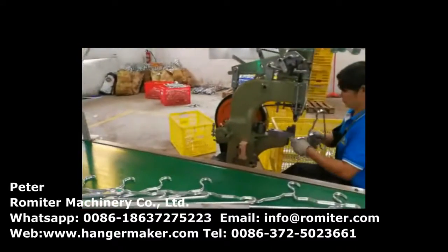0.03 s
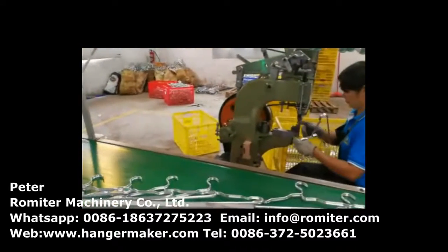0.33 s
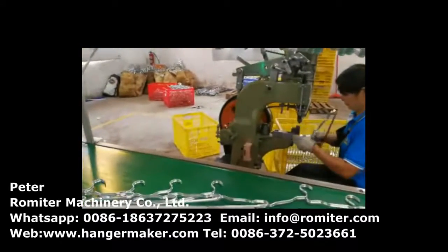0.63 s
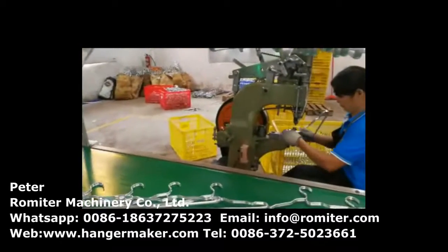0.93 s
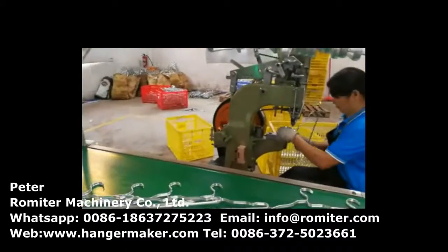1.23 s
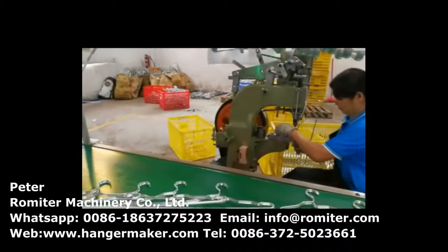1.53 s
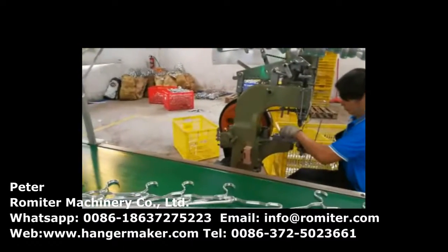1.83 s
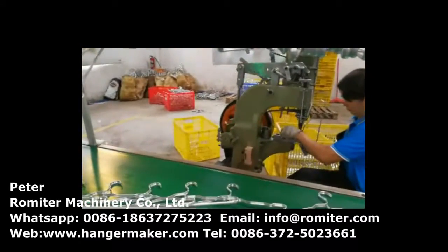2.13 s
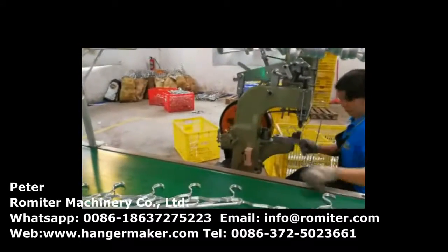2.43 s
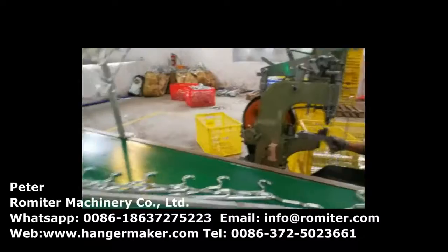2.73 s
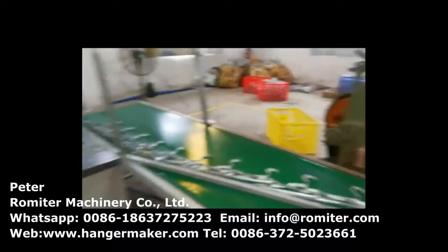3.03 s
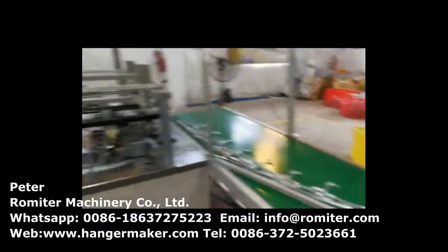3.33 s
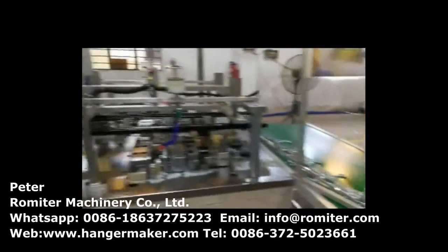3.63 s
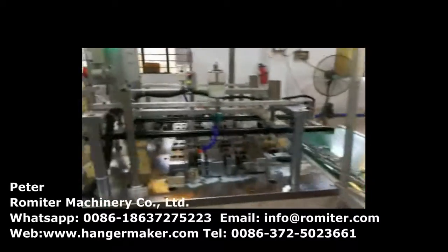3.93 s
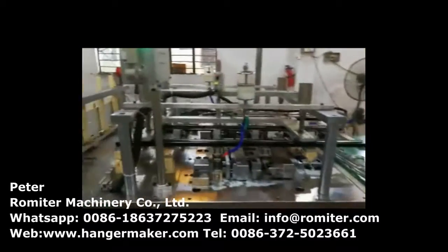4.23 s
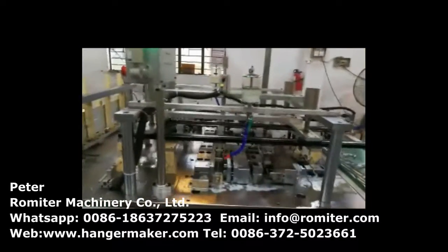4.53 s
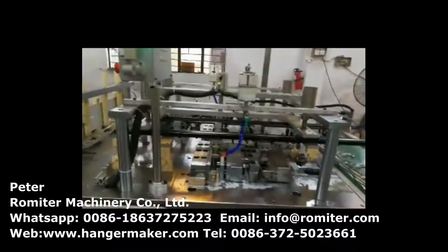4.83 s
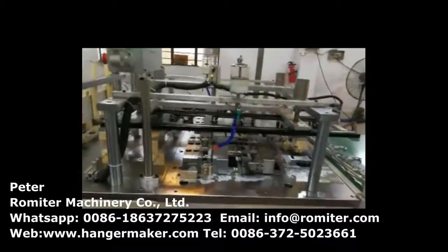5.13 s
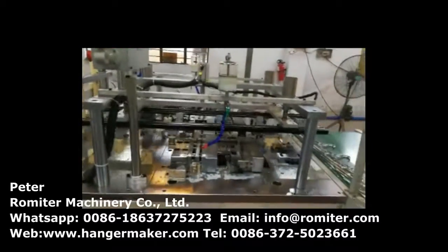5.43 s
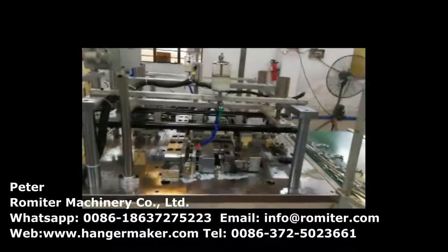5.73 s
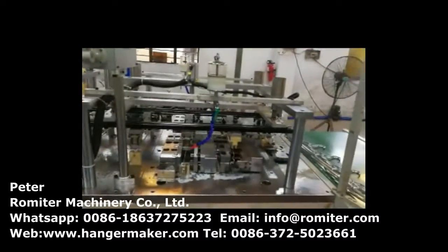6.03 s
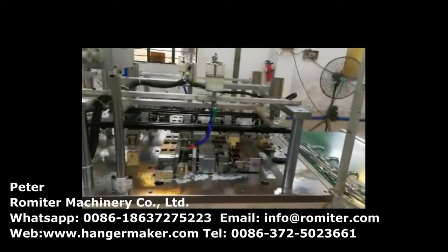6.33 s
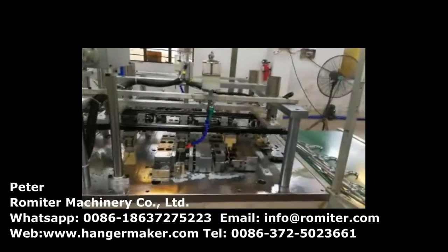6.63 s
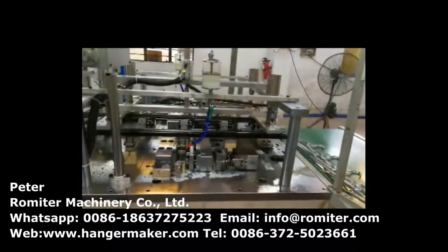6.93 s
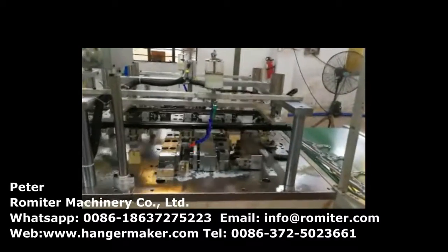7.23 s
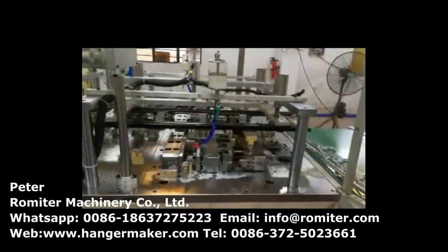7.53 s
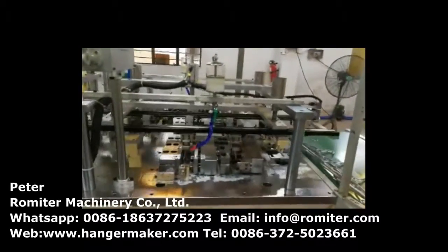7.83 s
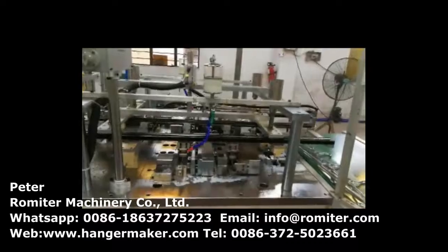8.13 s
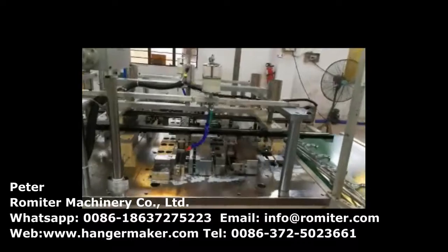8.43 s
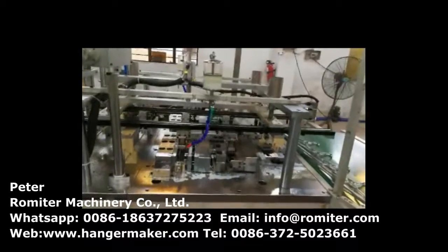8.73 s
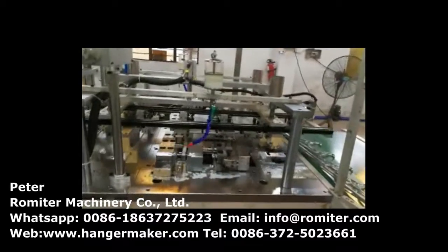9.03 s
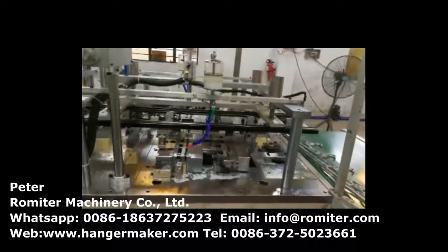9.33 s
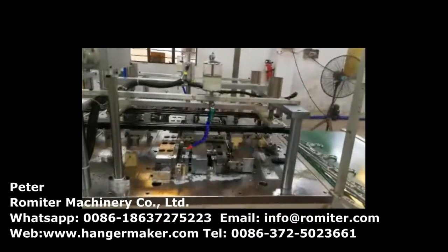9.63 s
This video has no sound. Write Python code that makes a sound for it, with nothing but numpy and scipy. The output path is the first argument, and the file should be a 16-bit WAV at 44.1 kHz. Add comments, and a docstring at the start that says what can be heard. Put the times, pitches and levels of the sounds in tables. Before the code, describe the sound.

Continuous factory noise surrounds the listener, with rumbling drives, rattling levers and dull thumps. Over it, near and to the right, a pneumatic wire forming machine keeps puffing and spitting air, with occasional falling squeals. Clusters of metal clanks come about two seconds in and again near six seconds, while steel wire rasps and rings in between. A few very high squeaks come from the left, and the machinery runs on throughout.

```python
"""Air hisses and spits close by on the right: a pneumatic machine forms wire coat hangers.
Its valves puff in the same order every cycle and its cylinders vent in falling chirps.
The forming tools clank; the steel wire scrapes and rings in its high bending modes.
Behind it, drives surge and rumble in a busy hall, ducked by gain control under each loud hiss."""
import sys
import numpy as np
from scipy import signal
from scipy.fft import rfft, irfft
from scipy.io import wavfile
from scipy.ndimage import uniform_filter1d

SR = 44100
rng = np.random.default_rng(int(sys.argv[2]) if len(sys.argv) > 2 else 0)


def persist_wave(psi):
    """Save psi, clipped to +-1, as 16-bit WAV."""
    counts = np.round(np.clip(psi, -1, 1) * 32767).astype(np.int16)
    wavfile.write(sys.argv[1], SR, np.atleast_2d(counts).T)


N = 436590
T = np.arange(N) / SR


def undb(db):
    """Decibels to gain."""
    return np.exp(np.asarray(db) * (np.log(10) / 20))


def unit(x):
    """Scale to rms 1."""
    return x / np.sqrt(np.mean(x ** 2))


def colour(x, points):
    """Filter by a spectrum of (f/Hz, gain/dB) points."""
    hz, db = np.transpose(points)
    f = np.fft.rfftfreq(N, 1 / SR)
    return irfft(rfft(x) * undb(np.interp(np.log(f + 1), np.log(hz), db)), N)


def resonate(x, hz, *widths_hz):
    """One resonance per width, in series; gain 1 at the centre."""
    for width in widths_hz:
        x = signal.lfilter(*signal.iirpeak(min(hz, SR * .45), hz / width, fs=SR), x)
    return x


def walk(rate_hz):
    """Random drift, rms 1."""
    steps = T * rate_hz
    points = rng.standard_normal(int(steps[-1]) + 2)
    return unit(np.interp(steps, np.arange(len(points)), points))


def rough(rate_hz, depth_db, ring_s):
    """Envelope of a steady flow with small random knocks on top, rms 1."""
    knocks = (rng.random(N) < rate_hz / SR) * undb(4 * np.minimum(rng.exponential(size=N), 3))
    clatter = unit(signal.lfilter([1], [1, -np.exp(-1 / (ring_s * SR))], knocks))
    return unit(np.sqrt(1 + (undb(depth_db) * clatter) ** 2))


def add(track, s, sound):
    """Mix a sound in at time s; it may overhang either end."""
    i = int(s * SR)
    first, last = max(i, 0), min(i + sound.shape[-1], N)
    if last > first:
        track[..., first:last] += sound[..., first - i:last - i]


def burst():
    """Time axis and stereo noise for one short event."""
    return T[:SR // 2], rng.standard_normal((2, SR // 2))


def envelope(t, length_s, attack_s, release_s):
    """Attack, hold, release."""
    return np.minimum(t / attack_s, 1) * np.exp(-np.maximum(t - length_s, 0) / release_s)


def power(events, attack_s, release_s):
    """Summed power of (t/s, length/s, level/dB) events."""
    out = np.zeros(N)
    for s, length_s, db in events:
        add(out, s, (undb(db) * envelope(T[:SR], length_s, attack_s, release_s)) ** 2)
    return out


def lulls(events, release_s, attack_s=0.013):
    """Brief level dips in dB."""
    out = np.zeros(N)
    for s, length_s, db in events:
        add(out, s, db * envelope(T[:SR], length_s, attack_s, release_s))
    return out


def hall(x, t60_s=0.43):
    """Diffuse tail from the walls, unrelated at the two ears."""
    t, noise = burst()
    tail = noise * np.exp(-np.log(1000) * t / t60_s) * (t > .008)
    return signal.fftconvolve(x, tail / np.sqrt(np.sum(tail[0] ** 2)), axes=1)[:, :N]


def scattered_noise(ring_s, direct, rate_hz):
    """Nearby steel scatters noise; each ear gets its own fine ripple, shifting as parts move."""
    source, out = rng.standard_normal((1, N)), 0
    for _ in range(2):
        t, noise = burst()
        paths = rfft((noise * np.exp(-t / ring_s))[:, :2048])
        paths /= np.sqrt(uniform_filter1d(np.abs(paths) ** 2, size=16, axis=1))  # ripple only
        out = out + walk(rate_hz) * signal.oaconvolve(source, irfft(paths), axes=1)[:, :N]
    steady = out / np.sqrt(uniform_filter1d(out ** 2, size=2048, axis=1))
    return unit(steady + direct * rng.standard_normal((2, N)))


# successive surges of a heavy drive: roar/dB, rumble/dB
DRIVE_SURGES = [(-29, -35), (-29.5, -33.5), (-28, -40.5), (-27.5, -33.5), (-23.5, -34), (-24.5, -30),
                (-35.5, -43)]
# lighter strokes of the machines around: t/s, length/s, roar/dB, rumble/dB
MACHINE_STROKES = [(0.964, .1, -33.5, -34), (1.08, 0.056, -27, -33), (2.567, 0.37, -28, -33),
                   (3.307, 0.14, -26.5, -33), (3.692, 0.037, -27, -34.5), (4.146, 0.45, -30, -36),
                   (4.618, 0.053, -37, -30), (4.946, 0.078, -29.5, -34.5), (5.247, 0.14, -29, -36),
                   (5.698, 0.47, -26.5, -34), (6.554, 0.33, -30.5, -39.5), (8.144, 0.037, -26.5, -32.5),
                   (8.457, 0.044, -28, -37), (9.242, 0.08, -30, -36.5), (9.547, 0.54, -33, -41)]

def workload(idle_db, column, first_s=-0.22, period_s=1.511, surge_s=0.37):
    """Roar (column 0) or rumble (column 1) in dB: idling, regular surges and single strokes."""
    surges = [(first_s + k * period_s, surge_s, db[column]) for k, db in enumerate(DRIVE_SURGES)]
    strokes = [(s, length_s, db[column]) for s, length_s, *db in MACHINE_STROKES]
    busy = power(surges, attack_s=0.15, release_s=0.18) + power(strokes, attack_s=0.04, release_s=0.18)
    return 10 * np.log10(undb(idle_db) ** 2 + busy)


# dips in the din: t/s, length/s, depth/dB
DIN_DIPS = [(.715, 0.21, -5.5), (1.25, 0.27, -1.5), (3.92, 0.3, -4), (4.74, 0.14, -1.5),
            (5.095, 0.067, -10.5), (6.48, 0.034, -1), (6.92, 0.3, -1), (8.02, 0.081, -3.5)]

def din_gain():
    """The din drops briefly now and then."""
    return undb(lulls(DIN_DIPS, release_s=0.032))


# frame resonances: f/Hz, width/Hz, gain/dB
FRAME_MODES = [(166.5, 6.8, 1.5), (192, 11.6, 3.5), (312, 24, -10), (508, 12, -16)]
# rumble spectrum: f/Hz, level/dB
RUMBLE_SPECTRUM = [(20, -18), (45, -8), (75, -1.5), (125, -0.5), (180, -3.5), (260, 2), (340, 2), (450, -5),
                   (700, -34), (2000, -58)]

def drives(db):
    """Motors, belts and strokes shake the frame; the bass is alike at both ears."""
    mid = rng.standard_normal(N)
    side = colour(rng.standard_normal(N), [(30, -8), (80, -13), (180, -14.5), (320, -12.5), (550, 0.5)])
    shake = np.array([mid + side, mid - side])
    force = undb(db) * rough(rate_hz=30, depth_db=-6, ring_s=.018)
    frame = sum(undb(g + 2.5 * walk(6)) * resonate(shake, hz, width) for hz, width, g in FRAME_MODES)
    rumble = undb(-3 + 2 * walk(7.7)) * unit(colour(shake, RUMBLE_SPECTRUM))
    return force * (rumble + undb(-4) * unit(frame))


# roar spectrum: f/Hz, level/dB
ROAR_SPECTRUM = [(150, -39), (350, -6.5), (560, -3.5), (700, 0), (1400, 1), (2000, -3.5), (2800, -7.5),
                 (4500, -25), (7000, -15), (15000, -41)]
# gear whine: f/Hz, width/Hz, level/dB
GEAR_BANDS = [(1692, 45, -50), (3400, 700, -40)]

def roar(db, gears_db=-2.5):
    """The other machines blur into a rattling roar; gears whine and chatter under load."""
    din = scattered_noise(ring_s=0.0095, direct=0.87, rate_hz=7)
    din *= rough(rate_hz=62, depth_db=0, ring_s=0.031)
    gears = sum(undb(g + 3.5 * walk(7)) * unit(resonate(din, hz, width, 2 * width))
                for hz, width, g in GEAR_BANDS)
    whine = undb(gears_db + db - db.mean()) * gears * undb([[-7], [0]])
    return undb(db) * unit(colour(din, ROAR_SPECTRUM)) + whine


def linkages(db, count=170, gain_db=-3, spread_db=2, ring_s=0.0065):
    """Cams and levers of the other machines clack at random, harder under load."""
    out, t = np.zeros((2, N)), T[:SR // 8]
    for when, size, side, *pitches in rng.random((count, 9)):
        modes = sum(np.sin(2 * np.pi * (600 * 5.5 ** p * t + rng.random((2, 1)))) for p in pitches)
        clack = undb(gain_db - spread_db * size) * modes * envelope(t, 0, 0.0012, ring_s)
        add(out, when * T[-1], clack * np.sqrt([[side], [1 - side]]))
    return undb(db) * out


# machine bed modes: f/Hz, level/dB
BED_MODES = [(80, 2), (120, 2), (185, 1), (280, 3.5)]
# slide landings: t/s, level/dB
SLIDE_THUMPS = [(.24, -38), (1.46, -36), (1.627, -31.5), (2.26, -35), (2.86, -32), (3.2, -35),
                (4.23, -39.5), (4.67, -39), (4.76, -35), (5.349, -39), (5.748, -35), (6.16, -31.5),
                (8.661, -32), (9.259, -34)]

def thumps(attack_s=0.0035, ring_s=0.025, scatter_db=2, detune=0.067):
    """A heavy slide lands and the machine bed booms briefly, alike at both ears."""
    out, t = np.zeros(N), T[:SR // 2]
    for s, db in SLIDE_THUMPS:
        boom = 0
        for hz, mode_db in BED_MODES:
            size, shift, phase = rng.standard_normal(3)
            cycles = hz * (1 + detune * shift) * t + phase
            boom += undb(mode_db + scatter_db * size) * np.sin(2 * np.pi * cycles)
        add(out, s, undb(db) * boom * envelope(t, attack_s, attack_s, ring_s))
    return out


# feed drive resonances: f/Hz, width/Hz, gain/dB
FEED_MODES = [(1490, 110, -1), (1682, 57, -2), (3370, 160, 0)]
# long pulls of wire: t/s, length/s, level/dB
FEED_PULLS = [(7.13, 0.36, -37), (7.37, 0.385, -31.5)]

def pulls():
    """The feed drive drones in its resonances while it draws a length of wire."""
    noise = rng.standard_normal((2, N))
    drone = sum(undb(db + 1.8 * walk(12)) * unit(resonate(noise, hz, width, 3 * width))
                for hz, width, db in FEED_MODES)
    return np.sqrt(power(FEED_PULLS, attack_s=0.02, release_s=0.027)) * drone * undb([[-3], [0]])


# roller rasp spectrum: f/Hz, level/dB
RASP_SPECTRUM = [(1200, -22), (2200, -9), (2800, -8), (3300, 0), (4200, -7), (4900, -6), (5400, -11.5),
                 (8000, -45)]

def rollers(air_db, level_db=-24, follow=0.24):
    """Wire rasps through the straightening rollers in tiny catches, harder as the cylinders move."""
    catches = scattered_noise(ring_s=0.0065, direct=0.28, rate_hz=9)
    catches *= rough(rate_hz=24, depth_db=-1.5, ring_s=0.031)
    return undb(level_db + follow * (air_db - air_db.mean())) * unit(colour(catches, RASP_SPECTRUM))


def jingle(count=90, spread_db=8, ring_s=0.0074):
    """Loose hangers and small parts tick together, each at its own high pitch."""
    out, t = np.zeros((2, N)), T[:SR // 8]
    for when, pitch, size, side in rng.random((count, 4)):
        hz = 6800 + 6500 * pitch ** 2
        ping = np.sin(2 * np.pi * hz * t) * envelope(t, .003, .003, ring_s)
        db = -27.5 - 8 * pitch + spread_db * size
        add(out, when * T[-1], undb(db) * ping * np.array([[.5 + side], [1]]))
    return out


# slide squeaks: t/s, level/dB, f/Hz
SLIDE_SQUEAKS = [(1.575, -29, 12700), (2.11, -18.5, 10640), (4.9, -20, 12900), (5.48, -27, 12800),
                 (9.365, -29, 12900)]

def squeaks(rise_s=0.017, width_hz=250):
    """A dry slide on the left gives brief, very high squeaks."""
    out = np.zeros((2, N))
    for s, db, hz in SLIDE_SQUEAKS:
        t, noise = burst()
        add(out, s, undb(db) * np.exp(-(t / rise_s - 1) ** 2) * unit(resonate(noise, hz, width_hz)))
    return out * undb([[0], [-7]])


# bending modes of the wire: f/Hz, gain/dB
WIRE_MODES = [(3560, 2), (3910, -2), (4285, -4), (4660, -4), (5040, -0.5), (5460, 1), (5880, -5), (6309, 1),
              (6765, 5), (7236, 0), (7710, 3), (8190, 0.5), (8742, -2.5), (9220, -1.5), (10292, -0.5)]

def wire(push, width_hz=55):
    """Air jets and strokes set the long wire ringing in its bending modes."""
    return sum(undb(db + 3.5 * walk(6)) * resonate(push, hz, width_hz) for hz, db in WIRE_MODES)


# ringing wire scrapes, short hisses and soft stretches of mid-pitched rasp:
# t/s, length/s, level/dB, brightest f/Hz, rasp re ring/dB
SCRAPES_AND_HISSES = [(0.655, 0.11, -24.5, 5450, -2), (0.699, 0.082, -24.5, 8000, 11.5),
                      (0.95, 0.1, -33, 4000, 11.5), (1.798, .23, -22, 8640, 5.5),
                      (1.817, 0.16, -25.5, 4270, -2), (3.828, .03, -17, 7400, 1),
                      (3.932, 0.045, -19.5, 6960, 4), (3.969, .07, -21, 7000, 2),
                      (4.345, 0.043, -23, 8200, 8.5), (4.352, 0.044, -26.5, 4400, 8.5),
                      (5.026, .025, -21.5, 6750, -4), (5.086, 0.072, -18, 7850, 5),
                      (7.711, 0.075, -22.5, 6550, -6), (7.837, 0.073, -16, 7400, -10),
                      (8.994, 0.13, -15, 7150, 8.5), (9.066, 0.11, -19.5, 6260, 5),
                      (1.449, 0.44, -35.5, 2700, 4.5), (6.171, 0.11, -20.5, 6560, -8),
                      (7.96, 0.082, -28, 4500, 5), (8.555, 0.041, -27.5, 4030, 9.5),
                      (8.719, .14, -38, 2660, 9), (9.529, .35, -35, 2600, 11.5)]

def scrapes_and_hisses(detune=0.006, catch_db=1, width_hz=45,
                       attack_s=0.0084, release_s=0.015, ring_s=0.039):
    """A noise band plus ringing wire modes: a stick-slip scrape, or a hiss or rasp if noise leads."""
    out = np.zeros((2, N))
    for s, length_s, db, hz, rasp_db in SCRAPES_AND_HISSES:
        t, noise = burst()
        push = resonate(noise, hz, 1470)
        modes = 0
        for f, mode_db in WIRE_MODES:
            mode = resonate(push, f * (1 + detune * rng.uniform(-1, 1)), width_hz)
            modes += undb(mode_db) * resonate(mode, f, 300)
        ring = unit(modes) * envelope(t, length_s, attack_s, ring_s)
        rasp = unit(resonate(noise, hz, 3000, 4800)) * envelope(t, length_s, attack_s, release_s)
        add(out, s, undb(db) * (ring + undb(rasp_db) * rasp))
    return out * unit(undb(catch_db * walk(110)))


# hanger knocks on the tooling: t/s, level/dB, brightest f/Hz, t60/s
HANGER_CLINKS = [(2.261, -13, 7700, 0.057), (2.286, -10, 7700, 0.035), (2.324, -15.5, 3870, 0.051),
                 (3.619, -13, 8950, 0.16), (5.636, -14, 7000, 0.12), (5.985, -14, 8400, 0.068),
                 (7.626, -14, 8600, .15), (7.776, -13, 3700, 0.065), (9.321, -13, 7350, 0.084)]

def clinks(scatter_db=4, detune=0.0123, reach_octaves=0.11, tick_db=-3, tick_s=0.0069):
    """A hanger strikes steel: a tick, then the wire rings in the modes the contact favours."""
    out = np.zeros((2, N))
    for s, db, hz, t60_s in HANGER_CLINKS:
        t, noise = burst()
        ring = 0
        for f, _ in WIRE_MODES:
            size, shift = rng.standard_normal(2)
            gain = undb(scatter_db * size) / (1 + (np.log2(f / hz) / reach_octaves) ** 4)
            cycles = f * (1 + detune * shift) * t + rng.standard_normal((2, 1))
            ring += gain * np.sin(2 * np.pi * cycles)
        tick = unit(resonate(noise, hz, 0.38 * hz)) * np.exp(-t / tick_s)
        add(out, s, undb(db) * (unit(ring) * np.exp(-np.log(1000) * t / t60_s) + undb(tick_db) * tick))
    return out


# modes of the struck die: f/Hz, level/dB
DIE_MODES = [(700, -1.5), (1100, -2), (1830, -1.5), (2100, -5), (2650, -9), (2950, -1.5), (3295, -0.5),
             (3470, 2), (3970, 0)]
# tool blows: t/s, level/dB, brightest f/Hz, t60/s
TOOL_BLOWS = [(1.997, -16, 2500, 0.085), (2.049, -5.5, 2700, 0.077), (2.11, -12.5, 2770, 0.081),
              (2.411, -15, 2000, 0.057), (5.814, -14.5, 2870, 0.087), (5.919, -13.5, 2460, 0.17),
              (6.311, -16, 3140, 0.076), (7.637, -13, 3040, 0.028), (7.776, -27, 4000, 0.066),
              (8.578, -24, 3600, 0.11), (9.267, -16, 4400, 0.1)]

def blows(scatter_db=3.5, detune=0.0198, reach_octaves=0.85, rattle_db=-3, crack_db=-8):
    """Steel tools hit their stops: a small crack, then the die rings while loose parts rattle."""
    out = np.zeros((2, N))
    for s, db, hz, t60_s in TOOL_BLOWS:
        t, noise = burst()
        ring = 0
        for f, mode_db in DIE_MODES:
            size, shift = rng.standard_normal(2)
            gain = undb(mode_db + scatter_db * size) / np.hypot(1, np.log2(f / hz) / reach_octaves)
            cycles = f * (1 + detune * shift) * t + rng.standard_normal((2, 1))
            ring += gain * np.sin(2 * np.pi * cycles)
        rattle = undb(rattle_db) * unit(resonate(noise, hz, hz, 2 * hz))
        decay = (1 - np.exp(-t / 0.00038)) * np.exp(-np.log(1000) * t / t60_s)
        crack = undb(crack_db) * noise * np.exp(-t / 0.0041)
        add(out, s, undb(db) * ((unit(ring) + rattle) * decay + crack))
    return out * undb([[-5], [0]])


# cylinders venting: t/s, level/dB, starting f/Hz, length/s
CYLINDER_VENTS = [(0.868, -15, 5000, 0.061), (1.678, -15, 4410, 0.055), (4.115, -14, 4400, 0.026),
                  (4.766, -12.5, 4900, 0.085), (5.577, -16, 4510, 0.04), (8.671, -8.5, 5020, 0.062),
                  (9.473, -14, 4200, 0.06)]

def vents(glide_s=.058, end_hz=2450, waver_hz=120, flutter_hz=280, spray_db=-10,
          echo_s=0.011, echo_db=2, tail_s=0.048, tail_db=-15):
    """A cylinder dumps its air: a rough squeal falls amid spray, echoed briefly by nearby steel."""
    out = np.zeros((2, N))
    flutter_band = signal.butter(2, flutter_hz, fs=SR, output="sos")
    spray_band = signal.butter(4, [3000, 5000], "bandpass", fs=SR, output="sos")
    for s, db, start_hz, length_s in CYLINDER_VENTS:
        t, noise = burst()
        hz = end_hz + (start_hz - end_hz) * np.exp(-t / glide_s) + waver_hz * walk(139)[:len(t)]
        flutter = unit(signal.sosfilt(flutter_band, noise))
        spray = unit(signal.sosfilt(spray_band, burst()[1][0]))
        pressure = envelope(t, length_s, 0.0017, 0.015) * np.exp(-t / 0.15)
        squeal = pressure * (flutter * np.sin(2 * np.pi * np.cumsum(hz) / SR) + undb(spray_db) * spray)
        paths = burst()[1] * (np.exp(-t / echo_s) + undb(tail_db) * np.exp(-t / tail_s))
        echo = signal.fftconvolve(squeal, paths / np.sqrt(np.sum(paths[0] ** 2)), axes=1)[:, :len(t)]
        add(out, s, undb(db) * (squeal + undb(echo_db) * echo) / np.sqrt(2))
    return out


# valve spits: t/s, level/dB, f/Hz, nominal width/Hz, length/s
VALVE_SPITS = [(0.423, -5.5, 7440, 3500, 0.0054), (1.001, -16, 8340, 3000, 0.037),
               (1.201, -10.5, 8650, 2500, 0.086), (1.39, -1, 6420, 250, 0.0035),
               (1.391, -6, 8400, 600, 0.0021), (3.864, -3, 6800, 3500, 0.014),
               (4.088, -19, 6740, 2160, 0.05), (5.417, -3, 7200, 2000, 0.0046),
               (7.77, -11, 4930, 5000, 0.012), (8.134, -16, 6620, 600, 0.041),
               (8.366, -6, 8250, 3000, 0.0059), (8.544, -14, 7700, 3000, 0.061),
               (8.92, -15.5, 7160, 2000, 0.073), (9.002, -10, 8400, 2500, 0.07),
               (9.827, -16.5, 6700, 950, 0.038)]

def spits(open_s=0.003, shut_s=0.0027):
    """A valve opens abruptly, whistles in its port for a moment and shuts."""
    out = np.zeros((2, N))
    for s, db, hz, width_hz, length_s in VALVE_SPITS:
        t, noise = burst()
        opening = (1 - np.exp(-t / open_s)) * np.exp(-np.maximum(t - length_s, 0) / shut_s)
        add(out, s, undb(db) * opening * unit(resonate(noise, hz, 0.5 * width_hz, 3 * width_hz)))
    return out


# exhaust puffs within each forming cycle: t/s, length/s, level/dB
CYCLE_PUFFS = [(0.039, 0.16, -18.5), (0.181, 0.058, -13.5), (0.328, 0.028, -11), (0.435, 0.14, -20),
               (0.757, 0.047, -17.5), (0.847, 0.04, -14.5), (1.124, 0.16, -20.5), (1.423, 0.13, -18.5),
               (1.66, 0.19, -21), (2.011, 0.14, -16.5), (2.736, 0.21, -20.5), (2.95, 0.11, -15.5)]
# one-off puffs: t/s, length/s, level/dB
SINGLE_PUFFS = [(0.972, 0.13, -23), (2.331, 0.1, -20), (3.406, 0.17, -18.5), (3.813, 0.073, -25),
                (4.7, 0.04, -10.5), (6.073, 0.12, -12), (6.219, 0.095, -15), (7.606, 0.26, -19),
                (8.002, 0.078, -22)]
# dips in the steady hiss: t/s, length/s, depth/dB
LEAK_DIPS = [(1.397, 0.077, -6), (2.45, 0.064, -11.5), (3.234, 0.095, -5), (5.18, 0.044, -18),
             (7.234, 0.61, -3), (8.393, 0.018, -17), (9.754, 0.12, -7)]

def airflow(cycle_s=3.9, leak_db=-20.5):
    """Air level in dB: a steady leak and a puff for each valve that opens."""
    cyclic = [(start + s, *rest) for start in np.arange(0, T[-1], cycle_s) for s, *rest in CYCLE_PUFFS]
    puffs = power(cyclic + list(SINGLE_PUFFS), attack_s=0.039, release_s=0.055)
    leak = undb(leak_db + lulls(LEAK_DIPS, release_s=0.038))
    return 10 * np.log10(leak ** 2 + puffs)


# air jet spectrum ahead of the ports: f/Hz, level/dB
JET_SPECTRUM = [(1500, -26), (3000, -9), (4000, -1.5), (5300, -0.5), (6400, 1), (8800, 3.5), (9600, -1),
                (11000, -4.5), (13000, -8), (15500, -14)]

def exhaust(db, ports_hz=(4000, 6300, 7300, 8400, 9500, 11000, 13000), width_hz=1300):
    """Air sputters from the silencers; each port swells and fades, so the colour keeps shifting."""
    air = scattered_noise(ring_s=0.0037, direct=0.64, rate_hz=9)
    air *= rough(rate_hz=45, depth_db=-5, ring_s=0.012)
    jet = colour(air, JET_SPECTRUM)
    ports = sum(undb(2.5 * walk(18)) * resonate(jet, hz, width_hz) for hz in ports_hz)
    return undb(db) * unit(colour(ports, [(2000, 11), (4000, 5.5), (7500, 5.85), (15000, 1.9)]))


# shading of the air and wire on the left: f/Hz, gain/dB
LEFT_SHADE = [(1200, 0.5), (3300, -12.5), (4700, -5.5), (6500, -14), (8500, -15.5), (10500, -7), (13000, 0),
              (15000, 1.5)]

def scene():
    """Air and wire are close on the right; the din comes from all round."""
    roar_db = workload(idle_db=-33.5, column=0)
    rumble_db = workload(idle_db=-41.5, column=1)
    air_db, din = airflow(), din_gain()
    events = spits() + vents() + scrapes_and_hisses() + clinks() + jingle()
    air = exhaust(air_db) + events + undb(-8.5) * hall(events)
    rasp_rise = undb(np.interp(T, [3.2, 4.2], [-4, 0]))
    left, right = air + undb(-7.5) * wire(air) + din * rasp_rise * rollers(air_db)
    near = np.array([colour(left, LEFT_SHADE), right])
    tools = blows() + squeaks()
    workshop = din * (roar(roar_db) + linkages(roar_db)) + np.sqrt(din) * drives(rumble_db)
    return workshop + thumps() + pulls() + tools + undb(-3) * hall(tools) + near


def record(dry, knee_db=-18, squeeze=0.64, recovery_s=0.026, ceiling=.85, top_hz=15600):
    """Gain control ducks everything under each loud hiss; peaks are rounded and the top is cut."""
    pole = np.exp(-1 / (recovery_s * SR))
    mean_square = uniform_filter1d(np.mean(dry ** 2, axis=0), size=500)
    detected = signal.lfilter([1 - pole], [1, -pole], mean_square)
    ducked = dry * (1 + (detected / undb(knee_db) ** 2) ** 2) ** (-squeeze / 4)
    rounded = ducked / (1 + (ducked / ceiling) ** 6) ** (1 / 6)
    return signal.sosfilt(signal.ellip(10, .2, 80, top_hz, fs=SR, output="sos"), rounded)


dry = scene()
out = record(dry)
persist_wave(out)
```